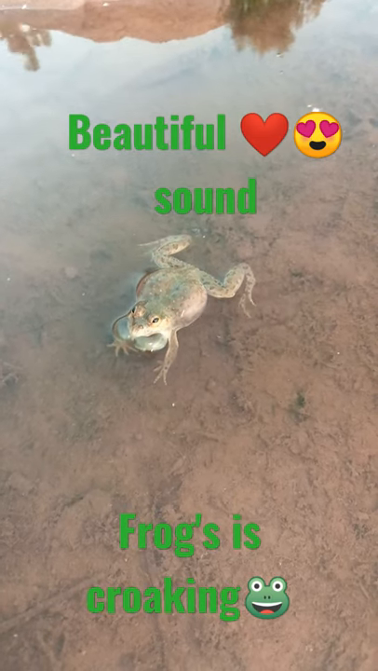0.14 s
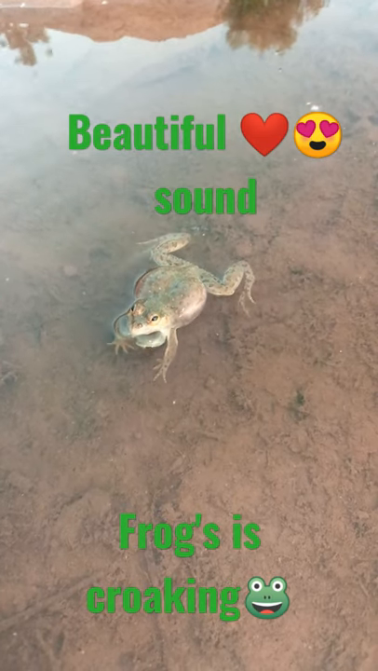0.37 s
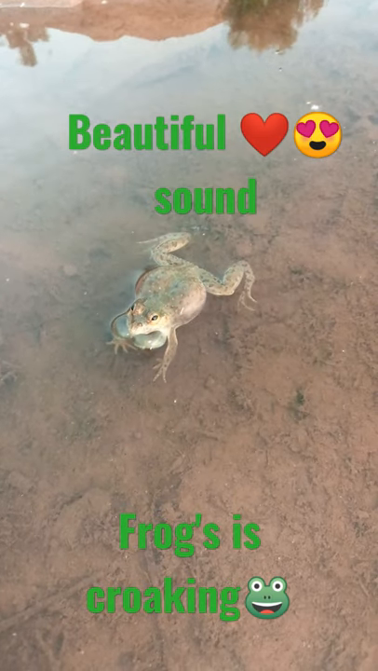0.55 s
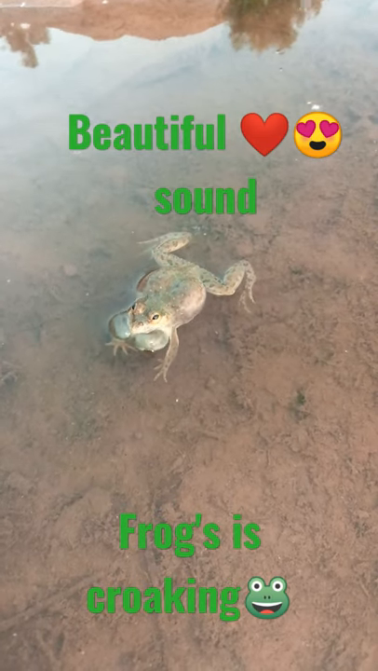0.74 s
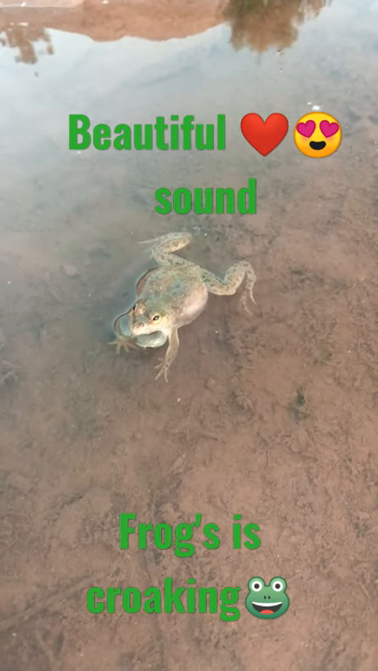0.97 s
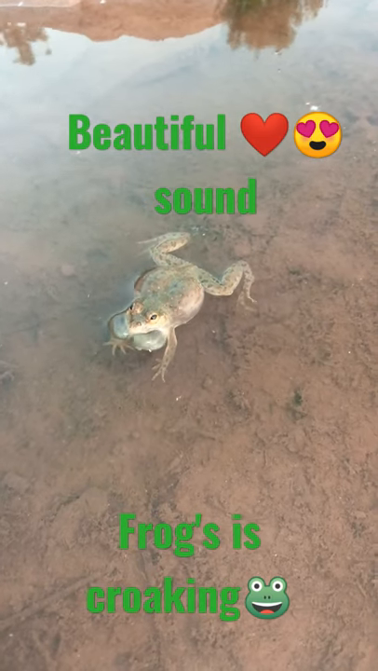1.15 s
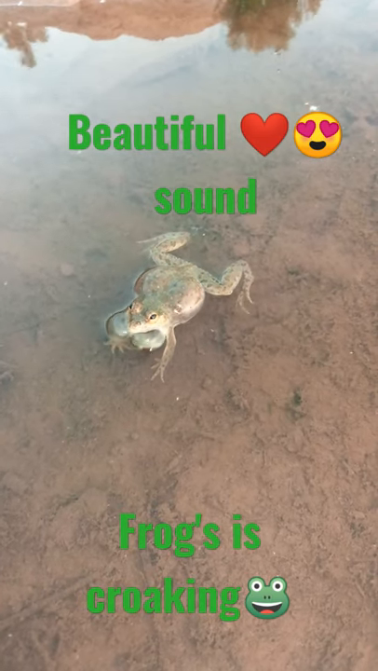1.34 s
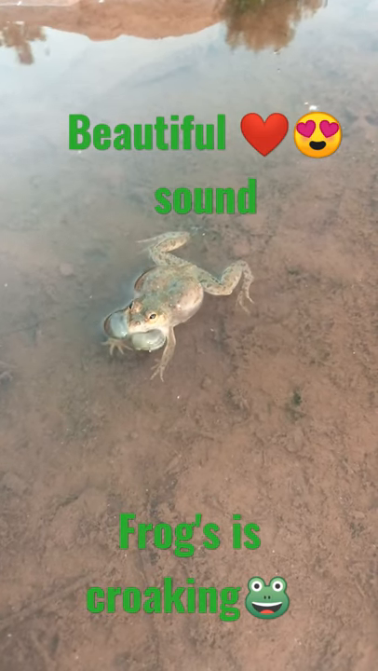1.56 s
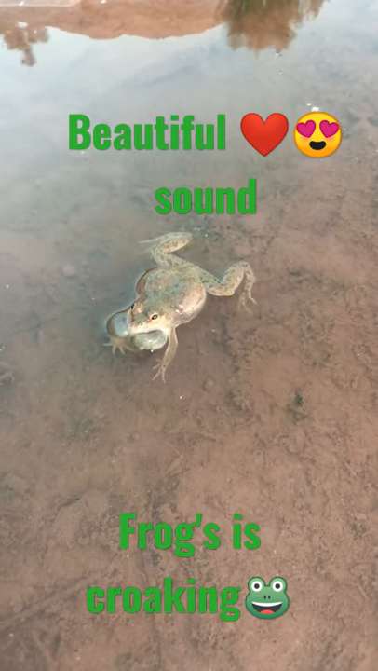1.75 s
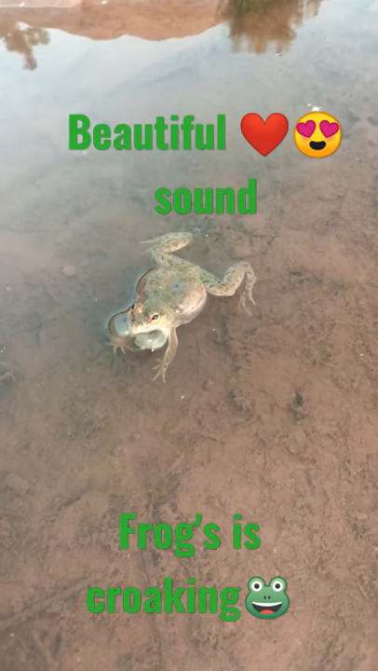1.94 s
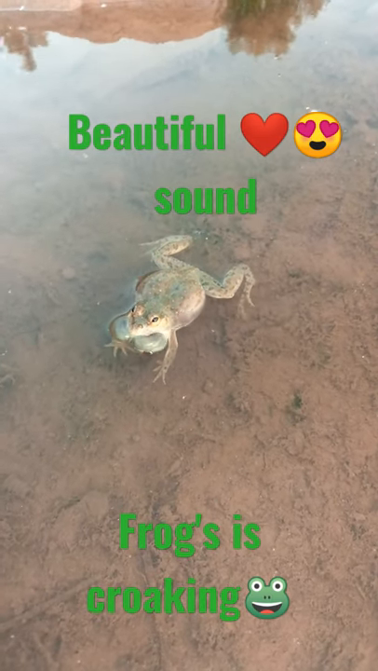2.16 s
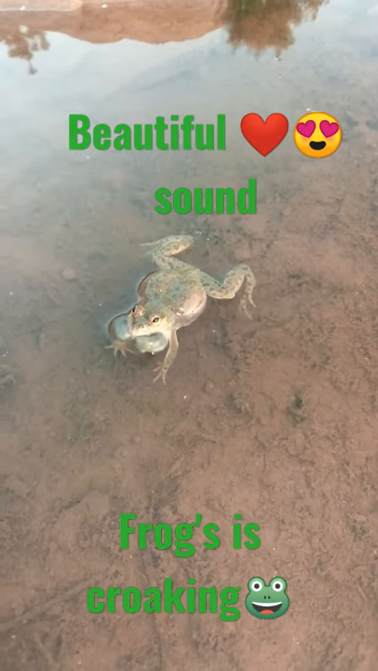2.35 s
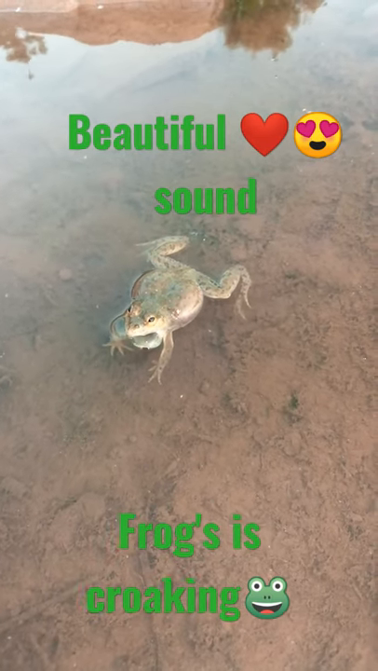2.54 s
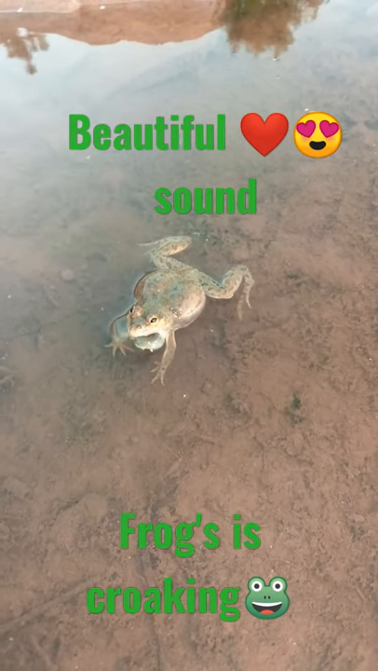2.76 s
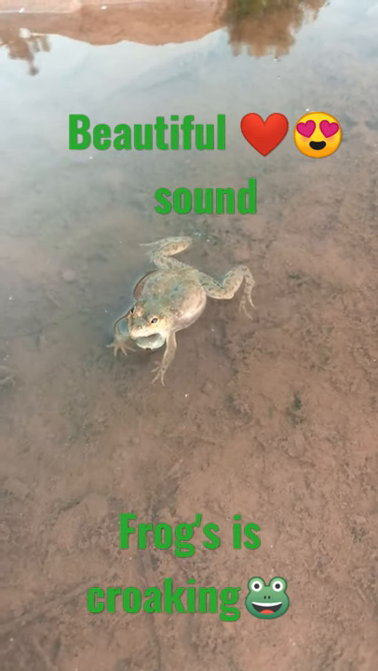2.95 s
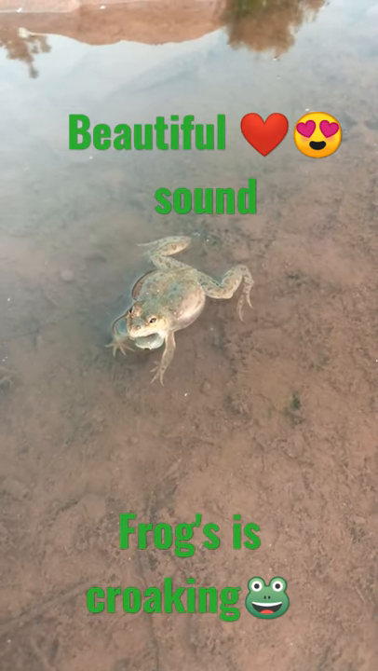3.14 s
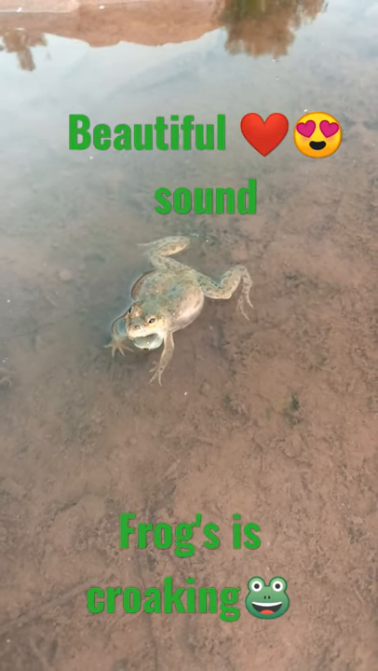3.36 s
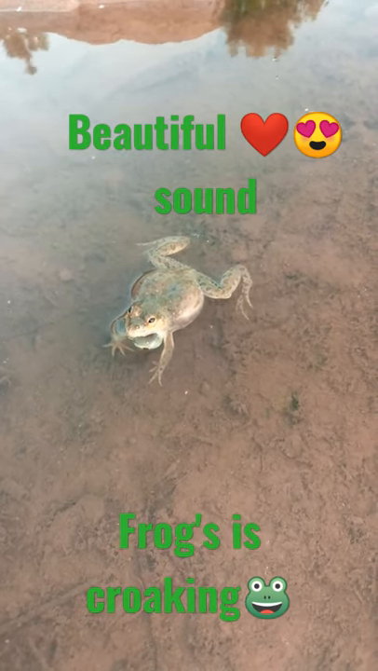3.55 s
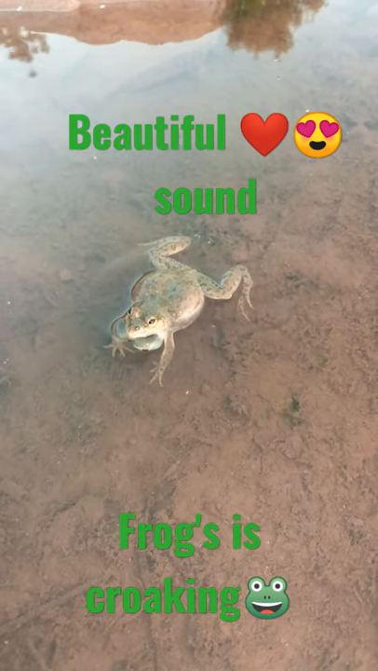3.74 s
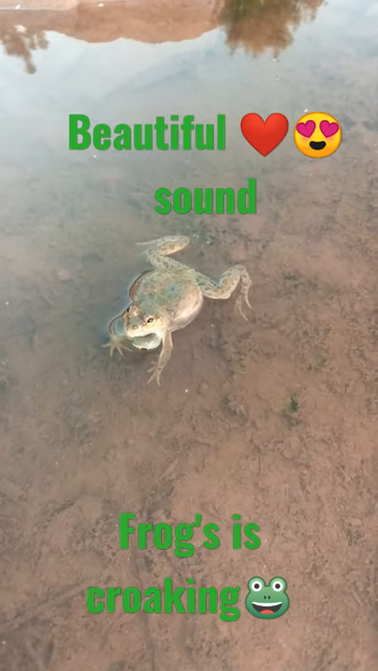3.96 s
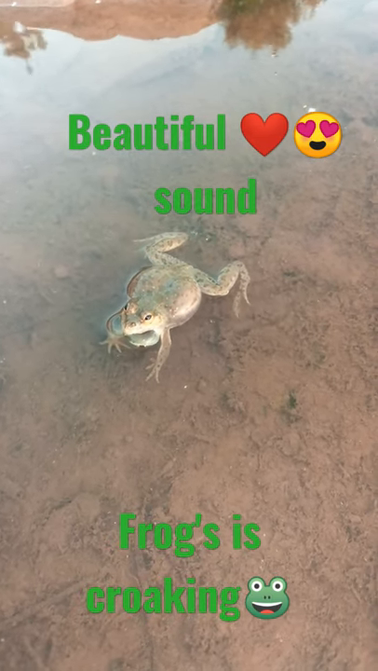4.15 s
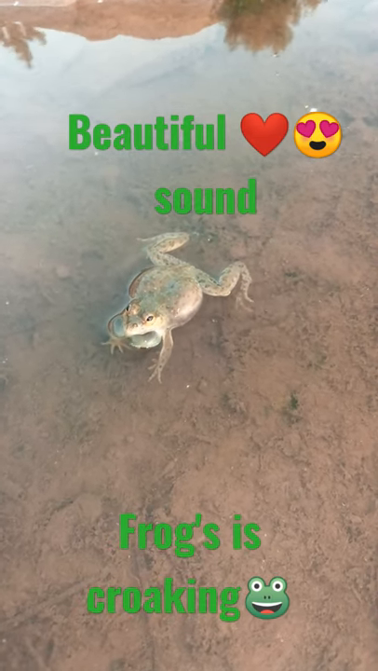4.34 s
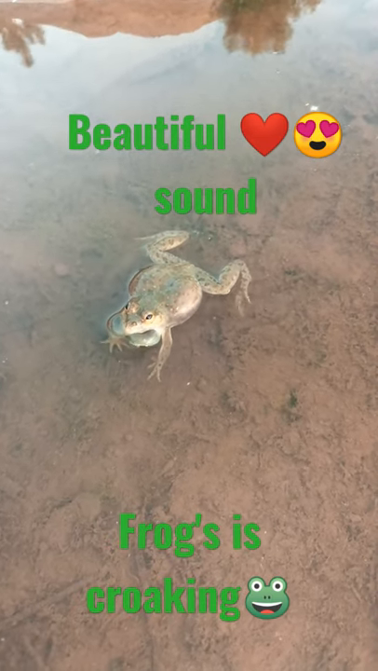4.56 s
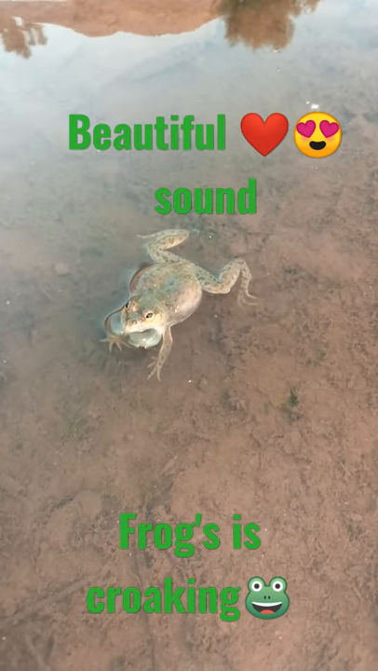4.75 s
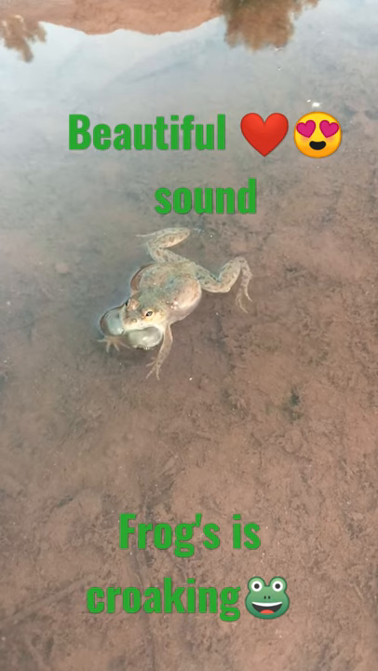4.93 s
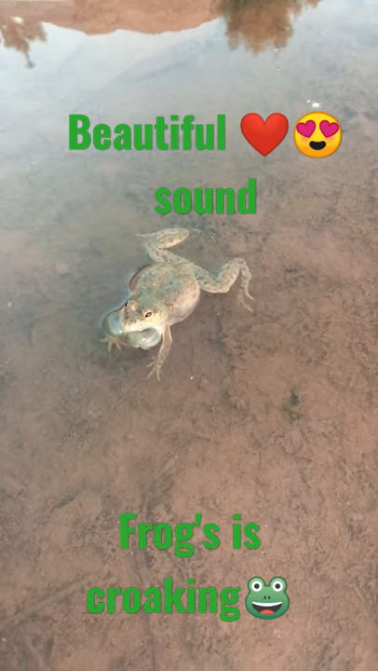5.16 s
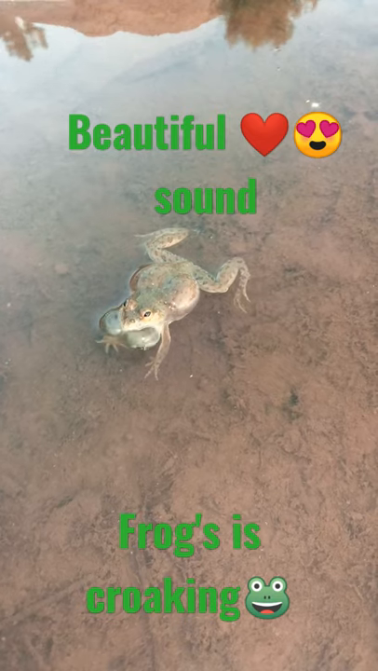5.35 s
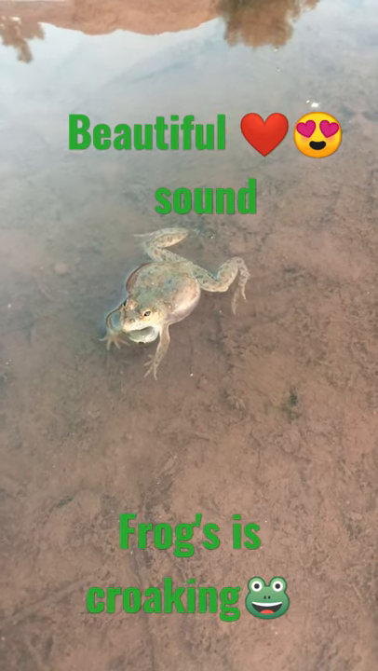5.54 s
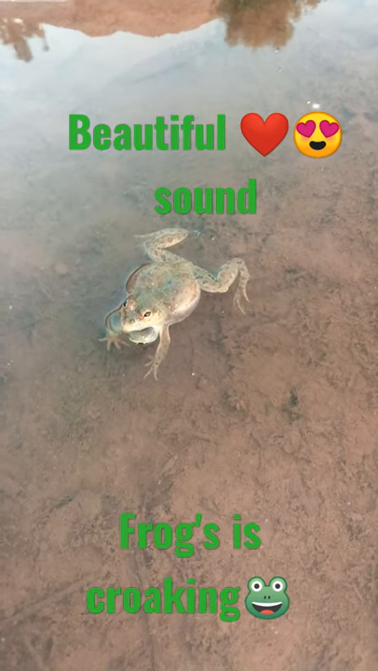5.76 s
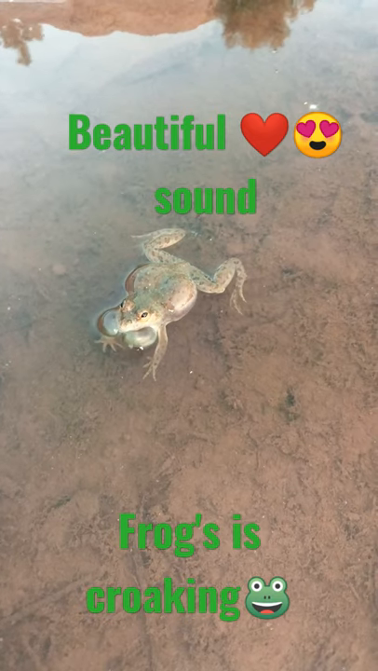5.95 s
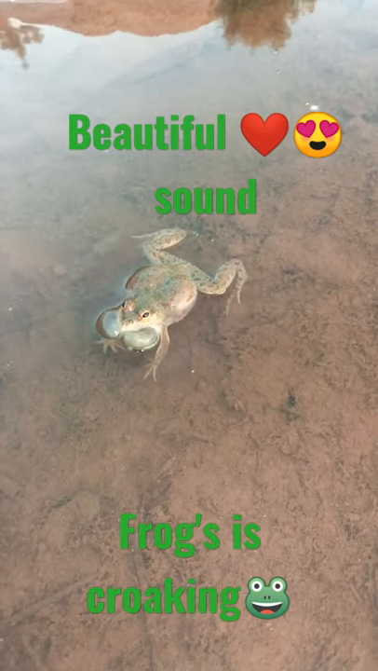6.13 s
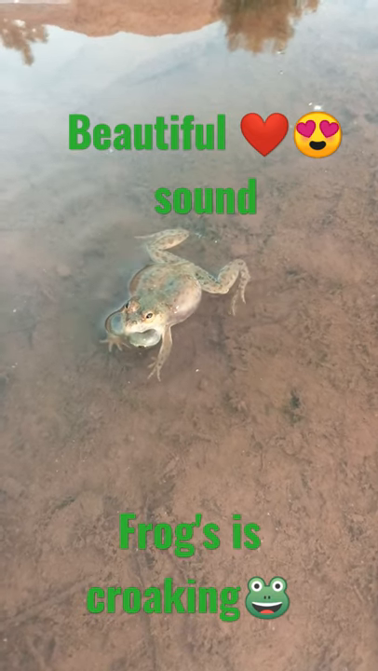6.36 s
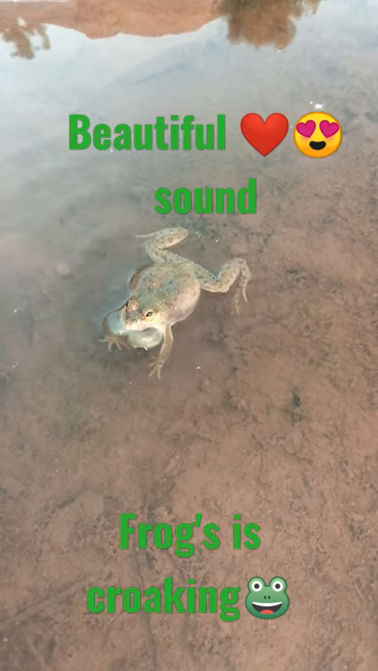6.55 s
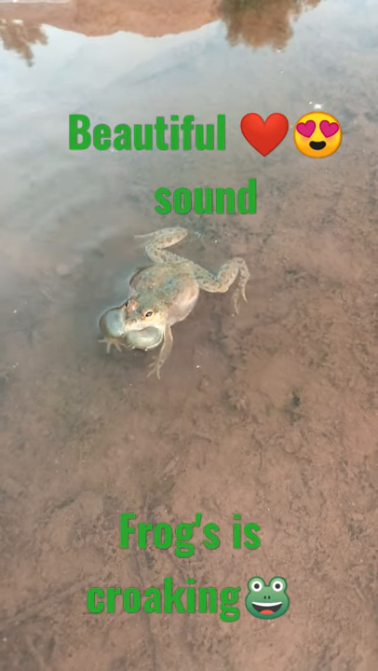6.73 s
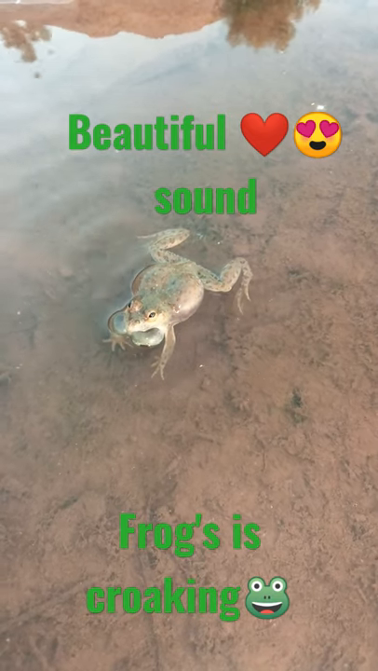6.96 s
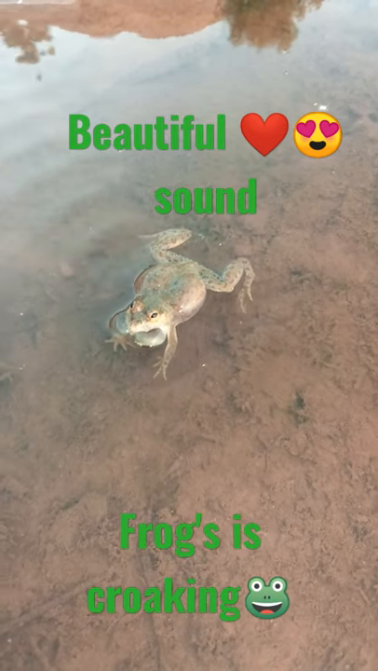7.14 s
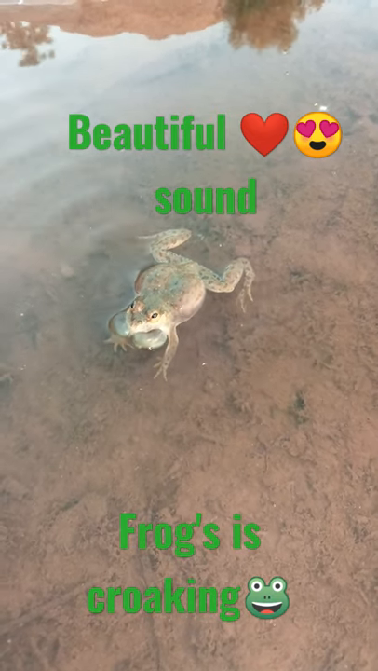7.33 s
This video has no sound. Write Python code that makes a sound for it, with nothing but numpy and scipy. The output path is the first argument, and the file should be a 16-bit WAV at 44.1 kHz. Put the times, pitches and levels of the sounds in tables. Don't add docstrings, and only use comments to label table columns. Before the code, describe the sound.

Close to a phone at a shallow pond, a frog gives short buzzy croaks about five per second, alternating with a fainter, duller frog across the water. A neighbour adds a few quacks. After a brief gap with a tiny bubble, frogs on both sides quack in rapid overlapping bouts. After a short lull, the near frog takes over with loud, sharp, clicking quacks against a rival. Low distant rumble and faint hiss lie beneath.

```python
import sys
import numpy as np
from scipy import signal
from scipy.fft import rfft, irfft, next_fast_len
from scipy.io import wavfile
from scipy.ndimage import uniform_filter1d

SR = 44100
rng = np.random.default_rng(int(sys.argv[2]) if len(sys.argv) > 2 else 0)


def transcribe(u):
    v = np.clip(np.atleast_2d(u).T, -1, 1)
    q = np.round(v * 32767).astype(np.int16)
    wavfile.write(sys.argv[1], SR, q)


def convert_level_to_amplitude(level_db):
    exponent = np.asarray(level_db, float) / 20
    return 10 ** exponent


N = 330309


def along(points, hz):
    f, v = np.transpose(points)
    return np.interp(np.log(hz + 1), np.log(f + 1), v)


def add(track, s, sound):
    track[round(s * SR):][:len(sound)] += sound


def wobble(shape, size):
    return np.cumsum(uniform_filter1d(rng.standard_normal(shape), size=size), -1)


# frequency in Hz, level in dB per Hz.
AIR_DB = [(20, -16.5), (60, -4), (230, -3), (450, -9), (620, -6), (820, -2.5), (950, -15.5), (2200, -14),
          (3500, -19.5), (8000, -28), (16500, -35.5)]
# time in s, level below about 500 Hz in dB.
BACKGROUND_DRIFT = [(0, -84.5), (1.249, -83), (3.3, -85), (4, -93.5), (5.6, -90), (6.999, -88)]
HUM_FOLLOWS, FULL_DRIFT_TOP_HZ = 0.63, 511


def air():
    hz, t, z = signal.stft(rng.standard_normal(N + 1024), SR, nperseg=1024)
    patches = uniform_filter1d(uniform_filter1d(rng.standard_normal(z.shape), 8, 0), 6, 1)
    z = z * convert_level_to_amplitude(along(AIR_DB, hz)[:, None] + 4.0 * patches / patches.std())
    s, db = np.transpose(BACKGROUND_DRIFT)
    follows = HUM_FOLLOWS + (1 - HUM_FOLLOWS) / (1 + (hz / FULL_DRIFT_TOP_HZ) ** 6)
    drift_db = np.outer(follows, np.interp(t, s, db - db.mean()))
    x = signal.istft(z * convert_level_to_amplitude(drift_db), SR, nperseg=1024)[1][:N]
    return x / x.std() * convert_level_to_amplitude(db.mean() + 8.5)


# frequency in Hz, level in dB per Hz.
HISS_DB = [(20, -46), (3000, -11.5), (9000, -13.5), (14200, -23.5), (15100, -6), (15700, -3.5),
           (16100, -41)]


def hiss():
    m = next_fast_len(N)
    hz = np.fft.rfftfreq(m, 1 / SR)
    x = irfft(rfft(rng.standard_normal(m)) * convert_level_to_amplitude(along(HISS_DB, hz)), m)[:N]
    return convert_level_to_amplitude(-91.0) * x / x.std()


# frequency in Hz, gain
# in dB.
SAC_DB = [(30, -36.5), (250, -20.5), (350, -20.5), (700, -25), (950, -10.5), (1200, 3), (8200, -2.5),
          (9500, -3.5), (16000, 11), (17000, -51.5)]


def radiate(x, size=1, dull_db=0):
    m = next_fast_len(N + 8192)
    hz = np.fft.rfftfreq(m, 1 / SR)
    gain_db = along(SAC_DB, size * hz) - dull_db * np.clip((hz - 7200) / 2500, 0, 1)
    return irfft(rfft(x, m) * convert_level_to_amplitude(gain_db), m)[:N]


def ring(modes, stretch, attack_ms, rough, scatter_db=1.07):
    hz, db, t60_ms = np.transpose(modes)[:, :, None]
    ms = np.arange(SR // 25) * 1000 / SR
    level_db = db + scatter_db * rng.standard_normal(hz.shape) - 60 * ms / t60_ms
    wander = rough * (hz / 8000) ** 0.7 * wobble(level_db.shape, 9)
    tones = convert_level_to_amplitude(level_db) * np.sin(2 * np.pi * hz * stretch * ms / 1000 + wander)
    return tones.sum(0) * (1 - np.exp(-ms / attack_ms)) ** 2


def train(ms, rate, modes, first, last, jitter, rise, brighten_db, attack_ms, rough, order=0):
    count = max(int(ms * rate / 1000 + 1.5), 2)
    out = np.zeros(round(ms * SR / 1000) + SR // 16)
    hz, db, t60_ms = np.transpose(modes)
    for u in np.linspace(0, 1, count):
        size = min((u + .15) / rise, 1) * min((1.2 - u) / .55, 1) * convert_level_to_amplitude(rng.normal(0, 1.2))
        tilt_db = brighten_db * (u - .5) * np.log2(hz / 1500)
        stretch = (first + (last - first) * u) ** ((hz[0] / hz) ** order)
        when_s = ms / 1000 * (.92 * u + .08 * u * u) + abs(rng.normal(0, jitter / rate))
        modes_now = np.transpose([hz, db + tilt_db, t60_ms])
        add(out, when_s, size * ring(modes_now, stretch[:, None], attack_ms, rough))
    return out / np.sqrt(np.sum(out ** 2) / (ms * SR / 1000))


# start in s, level in dB.
FAR_CROAKS = [(.128, -49.5), (0.298, -52.5), (0.47, -49.5), (0.637, -50), (.81, -49.5), (0.974, -47.5),
              (1.143, -47.5), (1.311, -49.5), (1.483, -46), (1.657, -45.5), (1.825, -50), (1.994, -42.5),
              (2.153, -44.5), (2.314, -45.5), (2.477, -47.5), (2.645, -46.5), (2.822, -50), (2.99, -47),
              (3.154, -45.5), (3.324, -46), (3.552, -53.5)]
# resonance in Hz, level in dB, t60 in ms.
FAR_MODES = [(1054, 2, 35.7), (1480, -7.5, 18), (1946.8, 5, 14.1), (2300, -4.5, 16), (3300, -23, 26),
             (4200, -24, 40), (5800, -23, 28)]
FAR_MS, FAR_SCATTER_MS, FAR_PULSES_PER_S = 26, 2, 347


def far_croaker():
    out = np.zeros(N + SR)
    for s, db in FAR_CROAKS:
        ms = rng.normal(FAR_MS, FAR_SCATTER_MS)
        croak = train(ms, FAR_PULSES_PER_S, FAR_MODES, 0.933, 1.05, 0.075, rise=0.33, brighten_db=7.0,
                      attack_ms=0.91, rough=0.17, order=1)
        add(out, s, convert_level_to_amplitude(db + 0.5) * croak)
    return radiate(out, dull_db=11.0)


# resonance in Hz, level in dB, t60 in ms.
NEAR_MODES = [(336, -6, 15.8), (1074.5, -4, 32.4), (1253, 7.5, 8.4), (1437.1, 10, 8.44), (2028, 13.5, 9.35),
              (2430, 5, 4.9), (2830, -6.5, 14), (3300, -16.5, 6.1), (4356, -3.5, 19.4), (5900, -2, 9.1),
              (6440, -8, 13), (7560, 3.5, 7), (10300, -21.5, 6.3), (13500, -30.5, 6.5)]
# frequency in Hz, share.
TIGHTENING = [(1400, 0.018), (1900, 0.25), (2400, 0.064), (4000, 0.034)]
POSTURE_DB, POSTURE_SHARE = .8, .005
LAST_DULL_DB = 2


def pulse(age_ms, posture, fade=0):
    hz, db, t60_ms = np.transpose(NEAR_MODES)
    age = np.tanh(age_ms / 22)
    tilt_db = (2.8 * (age - .55) - LAST_DULL_DB * fade * (hz > 1500)) * np.log2(hz / 1500)
    hz_now = hz * (1 + along(TIGHTENING, hz) * (age - .55) + POSTURE_SHARE * posture[0])
    modes = np.transpose([hz_now, db + tilt_db + POSTURE_DB * posture[1], t60_ms])
    return ring(modes, 1, attack_ms=.27, rough=.095, scatter_db=1)


# start in s, first to last pulse in ms, last pulse under the loudest in dB.
NEAR_CROAKS = [(0.1451, 23.6, 2), (0.3443, 24.2, 0.5), (0.555, 24.3, 2.5), (0.7588, 18.8, 0),
               (0.9513, 24.8, 5), (1.1632, 24.4, 0.5), (1.3781, 19.7, -1), (1.5814, 26.2, 6),
               (1.7809, 25, -2), (1.9706, 24.2, 4.5), (2.1664, 24.2, 0.5), (2.374, 24.6, 5.5),
               (2.5969, 18.3, -4), (2.8044, 23.4, 0), (3.0105, 18.7, -0.8), (3.2198, 26.2, 10),
               (3.7088, 16.8, 5), (4.08, 26.3, 2), (4.322, 27.5, 11.5), (4.548, 24, 0), (4.759, 25.2, 5),
               (4.969, 26, 0.5), (5.1749, 26, 2.5), (5.3806, 26.3, 2), (5.6246, 26.1, -5)]
PULSE_COUNTS = [10, 10, 10, 8, 10, 10, 8, 10, 10, 10, 10, 10, 8, 10, 8, 11, 7, 10, 11, 10, 10, 10, 10, 11,
                11]
# start in s, level under a full pulse in dB.
STUTTER_PULSES = [
    (1.4028, 11.5),
    (3.036, 3.5),
    (3.729, -1),
    (5.6574, 5),
]
CROAK_DB, FIRST_GAP_MS, SWELL_MS = -31, 2.3, 6.06
PAUSE_S, PAUSE_LOSS_DB = 0.228, .8
JITTER_MS, SIZE_SCATTER_DB = .05, .8


def near_croaker():
    out = np.zeros(N + SR)
    gaps_s = np.diff(np.transpose(NEAR_CROAKS)[0], prepend=0)
    late = np.clip((gaps_s - PAUSE_S) / .03, 0, 1)
    for (s, ms, fade_db), count, rested in zip(NEAR_CROAKS, PULSE_COUNTS, late):
        u = np.linspace(0, 1, count)
        posture = rng.standard_normal((2, len(NEAR_MODES)))
        ages_ms = FIRST_GAP_MS * (count - 1) * u * (1 - u) + ms * u * u
        ages_ms = ages_ms + JITTER_MS * rng.standard_normal(count)
        swell = np.clip((ages_ms + 4.3) / (SWELL_MS + 5 * rested + 4.3), 0, 1)
        fade = np.clip((u - .7) / 0.36, 0, 1) ** 1.7
        db = CROAK_DB - PAUSE_LOSS_DB * rested - fade_db * fade
        db = db + SIZE_SCATTER_DB * rng.standard_normal(count)
        for age_ms, size, faded in zip(ages_ms, swell * convert_level_to_amplitude(db), fade):
            add(out, s + (age_ms - .9) / 1000, size * pulse(age_ms, posture, faded))
    for s, under_db in STUTTER_PULSES:
        posture = rng.standard_normal((2, len(NEAR_MODES)))
        add(out, s - .0009, convert_level_to_amplitude(CROAK_DB - under_db) * pulse(26, posture))
        add(out, s + 0.0055, convert_level_to_amplitude(CROAK_DB - under_db - 4.0) * pulse(29, posture))
    return radiate(out)


def glides(rows):
    out = np.zeros(N + SR)
    for s, ms, db, first_hz, last_hz in rows:
        u = np.linspace(0, 1, round(ms * SR / 1000))
        wander = first_hz / 42000 * wobble(len(u), 30)
        waver = 1 + 0.5 * np.sin(2 * np.pi * ms / 9 * u + rng.uniform(0, 2 * np.pi))
        phase = 2 * np.pi * np.cumsum(first_hz + (last_hz - first_hz) * u) / SR
        add(out, s, convert_level_to_amplitude(db) * np.sin(np.pi * u ** 0.74) * waver * np.sin(phase + wander))
    return out[:N]


# start in s, length in ms, level in dB, pitch in Hz.
AFTER_RINGS = [(0.172, 3.8, -41.5, 1096), (0.589, 7.3, -39, 1180), (.6, 2.1, -37.5, 2320),
               (.781, 12, -33.5, 1102), (1.402, 10, -35, 1110), (2.399, 8.5, -37.5, 1103),
               (2.618, 13.3, -32, 1117), (3.029, 6.2, -35, 1112), (.878, 10, -51, 884),
               (2.71, 23, -46.5, 845), (4.572, 13, -34.5, 1123), (5.265, 18, -59, 1225),
               (5.269, 23, -74.5, 2320), (5.408, 9, -35, 1159), (5.416, 10, -39.5, 1083),
               (5.418, 7.8, -43, 2000), (5.656, 8, -37, 1250)]


def after_rings():
    return glides([(*row, 0.99 * row[-1]) for row in AFTER_RINGS])


def bout(rows, rule):
    *pairs, settle_s = rule
    s, db, click_db = np.transpose(rows)
    cold = np.exp(-(s - s[0]) / settle_s)
    chance = rng.standard_normal((3, len(s)))
    hz, after_ms, click_hz = [last + (first - last) * cold for first, last in pairs]
    hz = hz * (1 + 0.002 * chance[0])
    after_ms = after_ms + .12 * chance[1]
    click_hz = click_hz * (1 + 0.0054 * chance[2])
    return np.transpose([s, db, hz, after_ms, click_db, click_hz])


def quacks(rows, voice, rise_ms, fade_db, lag_ms, brief):
    overtones, shut_ms, attack_ms, upper = voice
    out = np.zeros(N + SR)
    for s, db, hz, after_ms, click_db, click_hz in rows:
        ms = np.arange(round((after_ms + 3) * SR / 1000)) * 1000 / SR
        swell = np.sin(np.pi / 2 * np.clip(ms / rise_ms, 0, 1)) ** 2
        env = swell * convert_level_to_amplitude(-fade_db * np.clip(ms - rise_ms, 0, None) ** 1.07)
        env = env * np.clip((after_ms - lag_ms + 0.43 - ms) / 0.45, 0, 1)
        phase = 2 * np.pi * hz * (ms + 0.0037 * ms * (6 - ms)) / 1000
        note = env * np.sin(phase)
        for k, over_db in overtones:
            level = convert_level_to_amplitude(over_db + rng.normal(0, 1.0)) * swell * env ** brief
            note = note + level * np.sin(k * phase + 0.2 * wobble(len(ms), 12))
        add(out, s + lag_ms / 1000, convert_level_to_amplitude(db) * note)
        ms = np.arange(-SR // 200, SR // 50) * 1000 / SR
        click = 1.45 * np.sin(2 * np.pi * click_hz * ms / 1000 + 1.6)
        click = click / (np.exp(-1.8 * ms / attack_ms) + np.exp(ms / shut_ms))
        add(out, s + (after_ms + ms[0]) / 1000, convert_level_to_amplitude(click_db) * click)
        crackle = ring(upper, 0.98471, 0.77 * attack_ms, rough=0.18)
        add(out, s + (after_ms - 1.646 * attack_ms) / 1000, convert_level_to_amplitude(click_db + 5.0) * crackle)
    return out[:N]


# start in s, note in dB, click in dB.
EARLY_QUACKS = [
    (.6792, -30, -27.5),
    (1.5286, -31, -28.5),
    (1.613, -25, -25.5),
    (1.7057, -26, -24.5),
    (1.8105, -25.5, -23),
]
# (Hz, dB, t60 in ms).
EARLY_SOUND = ([(2, -14), (3, -17), (4, -32), (5, -32.5), (6, -20)], 0.67, 0.92, [(2684, -6, 13),
                (4200, -14, 8), (5800, -34, 15), (6500, -15.5, 28), (8200, -32.5, 8)])
# note in Hz, click delay in ms, click in Hz; then settling time in s.
EARLY_WARMUP = (1098, 1170), (5, 8.6), (2400, 2580), 0.5


def early_frog():
    rows = bout(EARLY_QUACKS, EARLY_WARMUP)
    return radiate(quacks(rows, EARLY_SOUND, rise_ms=2.6, fade_db=1.2, lag_ms=-1.1, brief=0.54), dull_db=8.0)


# resonance in Hz, level in dB, t60 in ms.
SLOW_MODES = [(1000, -8, 19.2), (1250, -6, 23), (1590, 0, 12), (2570, -8, 6.4), (4384, -21.5, 9),
              (6580, -31, 12)]
GLIDE_RATE = 35


def slow_train(ms, rate, last_hz, **manner):
    first_hz = last_hz * (1 + GLIDE_RATE / rate)
    return train(ms, rate, SLOW_MODES, first_hz / 1000, last_hz / 1000, order=6, **manner)


# start in s, length in ms, level in dB, pulses per s, last resonance in Hz.
RATTLE_CALLS = [
    (0.844, 39.5, -49, 86, 913),
    (2.682, 14.7, -43, 105, 1000),
    (2.706, 13.4, -50, 160, 823),
]


def rattles():
    out = np.zeros(N + SR)
    for s, ms, db, rate, hz in RATTLE_CALLS:
        call = slow_train(ms, rate, hz, jitter=0.081, rise=0.81, brighten_db=4.5, attack_ms=0.94, rough=0.381)
        add(out, s, convert_level_to_amplitude(db) * call)
    return radiate(out, size=1.8, dull_db=9.5)


# start in s, length in ms, level in dB, first Hz, last Hz.
BIRD_CALLS = [(1.298, 25, -75, 5300, 5800), (1.411, 37, -70, 5600, 5000), (1.471, 107, -68.5, 5519, 5900),
              (1.82, 62.06, -69.5, 4850, 4500), (1.87, 340, -82, 4505, 4450), (2.104, 27, -75, 5630, 5000),
              (2.125, 16, -74, 4730, 5430), (2.137, 22, -66.5, 5450, 4500), (2.885, 55, -76, 5354, 5700),
              (3.17, 51, -70.5, 3500, 3500), (3.551, 44, -68.5, 5480, 5900), (6.499, 44, -57, 5400, 5200),
              (6.59, 48.9, -61, 5400, 5800), (7.191, 34, -65, 5800, 5000)]


def birds():
    return glides(BIRD_CALLS)


# start in s, level in dB.
CASE_TICKS = [
    (3.4577, -65),
    (3.47, -71),
    (3.551, -72),
    (2.469, -71.5),
    (2.893, -74),
    (5.733, -74),
]
# resonance in Hz, level in dB, t60 in ms.
CASE_MODES = [(4405.5, -21, 20), (5900, -15, 22), (8130, 1.5, 15.21), (15450, -17, 6.8)]


def ticks():
    out = np.zeros(N + SR)
    for s, db in CASE_TICKS:
        add(out, s, convert_level_to_amplitude(db) * ring(CASE_MODES, 0.66, attack_ms=0.28, rough=0.53))
    return out[:N]


# start in s, length in ms, level in dB, first Hz, last Hz.
BUBBLE_NOTES = [
    (3.359, 33, -51, 1484, 1250),
    (3.369, 37, -53, 345.7, 444),
    (3.384, 8.6, -60.5, 3550, 3500),
    (3.407, 18, -52, 1300, 1200),
    (3.406, 32, -56.5, 442.5, 650),
    (3.44, 23, -69, 820, 1107),
]


def bubble():
    return glides(BUBBLE_NOTES)


def purr(rows, below_db, lead_ms, modes, rate=210, rough=.52):
    out = np.zeros(N + SR)
    for s, db, *_ in rows:
        lead = train(lead_ms - 5, rate, modes, .85, 1.15, 0.15, rise=0.16, brighten_db=6,
                     attack_ms=0.65, rough=rough, order=1)
        add(out, s - lead_ms / 1000, convert_level_to_amplitude(db - below_db) * lead)
    return out[:N]


# resonance in Hz, level in dB, t60 in ms.
FILLING_MODES = [(1000, -2, 50), (1765, 4.5, 20.3), (2590, -18, 15), (4400, -19.5, 7.4), (5960, -7.5, 19)]
# start in s, note in dB, click in dB.
LEFT_QUACKS = [(3.5027, -38, -37), (3.5817, -25.5, -34), (3.6599, -25, -29), (3.7426, -25, -29.5),
               (3.8271, -23.5, -27.5), (3.9127, -23, -33.5), (3.9968, -23.5, -26.5), (4.0793, -25, -24.5),
               (4.1627, -22, -26), (4.2475, -21, -26.5), (4.3365, -17.5, -20), (4.4229, -22.5, -34.5),
               (4.5159, -22, -28), (4.6071, -21.5, -29)]
# (Hz, dB, t60 in ms).
LEFT_SOUND = ([(2, -13), (3, -21), (4, -35), (5, -34), (6, -26)], 0.74, 0.91, [(2607, -3.5, 26),
               (4600, -13.5, 18), (5800, -30, 20), (6450, -13.5, 26.5), (11800, -46.5, 16)])
# note in Hz, click delay in ms, click in Hz; then settling time in s.
LEFT_WARMUP = (1143, 1221), (9.2, 8.2), (2406, 2550), 0.47


def left_frog():
    rows = bout(LEFT_QUACKS, LEFT_WARMUP)
    calls = quacks(rows, LEFT_SOUND, rise_ms=4.87, fade_db=3.5, lag_ms=-1.2, brief=0.85)
    return radiate(calls, dull_db=8.0) + radiate(purr(LEFT_QUACKS, 33, 26, FILLING_MODES), dull_db=15.0)


# start in s, note in dB, click in dB.
RIGHT_QUACKS = [(3.8822, -34, -42), (3.9649, -27, -27.5), (4.0519, -24, -22), (4.1423, -23, -20),
                (4.2373, -25.5, -18.5), (4.4339, -22, -18), (4.5303, -21, -18), (4.6247, -23, -17.5),
                (4.7184, -24, -17.5), (4.812, -24, -19), (4.9075, -23.5, -19), (5.0077, -23, -20.5),
                (5.108, -23.5, -19.5), (5.2063, -22.5, -21)]
# (Hz, dB, t60 in ms).
RIGHT_SOUND = ([(2, -4.5), (3, -20.5), (4, -35.5), (5, -23), (6, -19), (9, -41.5)],
                1.3, 1, [(2506, -12, 23), (3690, -21, 20), (5000, -31, 6.4), (6360, -27.5, 41),
                (7100, -27, 27), (11100, -39, 29)])
# note in Hz, click delay in ms, click in Hz; then settling time in s.
RIGHT_WARMUP = (1130, 1194), (7, 7.9), (2700, 2484), 0.22


def right_frog():
    rows = bout(RIGHT_QUACKS, RIGHT_WARMUP)
    calls = quacks(rows, RIGHT_SOUND, rise_ms=3.4495, fade_db=3.5, lag_ms=-.8, brief=0.7)
    return radiate(calls, dull_db=8.0) + radiate(purr(RIGHT_QUACKS, 35.0, 33, FILLING_MODES), dull_db=15.0)


# start in s, length in ms, level in dB, pulses per s, last resonance in Hz.
GROAN_CALLS = [
    (4.029, 99, -52, 85, 684),
    (4.644, 210, -57.5, 83, 510),
    (6.407, 100, -51.5, 91, 514),
]


def groans():
    out = np.zeros(N + SR)
    for s, ms, db, rate, hz in GROAN_CALLS:
        call = slow_train(ms, rate, hz, jitter=.28, rise=.2, brighten_db=-8, attack_ms=2, rough=.45)
        add(out, s, convert_level_to_amplitude(db) * call)
    return radiate(out, size=1.8, dull_db=9.5)


# length in ms, level in dB, pitch in Hz.
BLEAT_NOTE = (21, -36.5, 1003)
# multiple, level in dB, fade in dB per ms.
BLEAT_OVERTONES = [(1, 10.5, 0.5151), (1.92, -2, 0.7883), (2.9, -21.5, -0.5395), (4.6, -29, 0),
                   (6.4, -11.5, 0.5)]
# resonance in Hz, level in dB, t60 in ms.
RASP_MODES = [(1470, -3.5, 6.8), (2000, 1, 7.8), (2610, 0.5, 7.6), (4500, -20, 7), (6500, -14, 9)]
BLEAT_START_S = 5.4552


def bleat():
    out = np.zeros(N + SR)
    length_ms, db, hz = BLEAT_NOTE
    ms = np.arange(SR // 20) * 1000 / SR
    env = (1 - np.exp(-ms / 0.61)) / (1 + np.exp((ms - length_ms) / 1.7))
    for k, over_db, fades_db in BLEAT_OVERTONES:
        tone = np.sin(2 * np.pi * k * hz * ms / 1000 + .022 * k * wobble(len(ms), 20))
        add(out, BLEAT_START_S, convert_level_to_amplitude(db + over_db - fades_db * ms) * env * tone)
    rasp = train(11, 480, RASP_MODES, 0.85, 0.98, .25, rise=.16, brighten_db=-6, attack_ms=0.44, rough=.3)
    add(out, BLEAT_START_S, convert_level_to_amplitude(db - 9) * rasp)
    return radiate(out, dull_db=7)


# start in s, note in dB, click in dB.
RIVAL_QUACKS = [(5.9698, -30, -26.5), (6.0429, -24.5, -25), (6.1207, -23, -22), (6.2008, -23, -20),
                (6.2827, -25, -20.5), (6.4461, -21, -17.5), (6.5295, -22, -18), (6.6129, -22, -18),
                (6.6973, -23.5, -19), (6.7826, -25.5, -21), (6.8663, -26, -21.5), (7.0345, -22, -16),
                (7.1187, -22, -16), (7.2071, -22.5, -16.5), (7.3018, -23, -20.5), (7.386, -23.5, -18),
                (7.4668, -22.5, -17)]
# (Hz, dB, t60 in ms).
RIVAL_SOUND = ([(2, -15.5), (3, -28), (5, -19), (6, -27)], 0.6342, 0.96, [(2376.2, -16.5, 32),
                (3500, -19.5, 10.4), (4650, -36, 45), (6462.4, -27.5, 33.46), (7701.4, -26, 7.8)])
# note in Hz, click delay in ms, click in Hz; then settling time in s.
RIVAL_WARMUP = (1127, 1251), (8.7, 8.4), (2450, 2302.6), 0.54


def rival_frog():
    rows = bout(RIVAL_QUACKS, RIVAL_WARMUP)
    calls = quacks(rows, RIVAL_SOUND, rise_ms=4.0, fade_db=3.5, lag_ms=-0.967, brief=1.0)
    lead_in = purr(RIVAL_QUACKS[1:], 37.196, 28, FILLING_MODES)
    return radiate(calls, dull_db=8.0) + radiate(lead_in, dull_db=15.0)


# start in s, note in dB, click in dB.
NEAR_QUACKS = [(5.9994, -15, -17.5), (6.0828, -13, -13), (6.1712, -13.5, -11), (6.2641, -13, -12.5),
               (6.3643, -13, -9), (6.4668, -13, -10), (6.5659, -12.5, -10), (6.6626, -12.5, -10),
               (6.7598, -12, -9.5), (6.857, -12.5, -9.5), (6.9517, -13.5, -9.5), (7.048, -13, -9.5),
               (7.1433, -12, -9.5), (7.2406, -12.5, -10.5), (7.3402, -12.5, -9)]
# (Hz, dB, t60 in ms).
NEAR_SOUND = ([(2, -23), (3, -12), (4, -36), (5, -20.5), (6, -15), (8, -36), (10, -44.5)],
               0.41, 0.23544, [(4220, -17.5, 13.296), (2000, -32, 33), (2750, -26, 38), (3500, -17, 9.8),
               (5600, -25.5, 6.777), (7680, -13.5, 10.7), (10240, -22.5, 4), (12200, -34.5, 3.9),
               (15231, -52, 4.1)])
# note in Hz, click delay in ms, click in Hz; then settling time in s.
NEAR_WARMUP = (1232, 1319), (7.8, 8.1), (2950, 3030), 0.3
# resonance in Hz, level in dB, t60 in ms.
PURR_MODES = [(1200, -13, 19), (1520, 4, 26.65), (1955, 3, 28), (2370, 4.5, 13), (4300, 2, 13),
              (6300, -2, 12), (7560, 3, 12.8)]


def near_quacker():
    rows = bout(NEAR_QUACKS, NEAR_WARMUP)
    calls = quacks(rows, NEAR_SOUND, rise_ms=2.612, fade_db=1.7, lag_ms=-.55, brief=1.53)
    return radiate(calls + purr(NEAR_QUACKS[1:], 34.6, 33, PURR_MODES, rate=135, rough=0.29))


# frequency in Hz, t60 in s.
BANK_T60 = [(300, 0.036), (1200, 0.22), (1800, .24), (2500, 0.23), (5500, 0.28), (7600, .1), (10000, 0.027)]


def bank(x, delay_ms, size):
    out, step = np.zeros(N + SR), SR // 3
    for start in range(0, N, step):
        hz, t, z = signal.stft(rng.standard_normal(step), SR, nperseg=128)
        decay = convert_level_to_amplitude(-60 * t / size / along(BANK_T60, hz)[:, None])
        tail = signal.istft(z * decay, SR, nperseg=128)[1]
        echo = signal.fftconvolve(x[start:start + step], tail / np.linalg.norm(tail))
        add(out, start / SR + delay_ms / 1000, echo)
    return out[:N]


SLAP_S, SLAP_DB = .0198, -24


def slapback(x):
    return convert_level_to_amplitude(SLAP_DB) * np.pad(uniform_filter1d(x, size=7), (round(SLAP_S * SR), 0))[:N]


def scene():
    near = near_croaker()
    far = far_croaker() + after_rings() + rattles() + birds() + ticks() + bubble() + groans() + bleat()
    others = early_frog() + left_frog() + right_frog() + rival_frog()
    loud = near_quacker()
    to_water = convert_level_to_amplitude(-25) * near + convert_level_to_amplitude(-27.5) * loud + convert_level_to_amplitude(-20.5) * others + convert_level_to_amplitude(-11.5) * far
    ripples = bank(to_water, delay_ms=0.54, size=.2)
    to_bank = convert_level_to_amplitude(-48.5) * near + convert_level_to_amplitude(-40.5) * loud + convert_level_to_amplitude(-34.0) * others + convert_level_to_amplitude(-33.5) * far
    echoes = bank(to_bank, delay_ms=9.2, size=1.1)
    return (near + loud + others + far + ripples + slapback(others) + echoes + air() + hiss())[None]


def top_cut(x):
    return signal.sosfilt(signal.butter(12, 16300, fs=SR, output="sos"), x)


def record(dry):
    return top_cut(dry)


dry = scene()
out = record(dry)
transcribe(out)
```